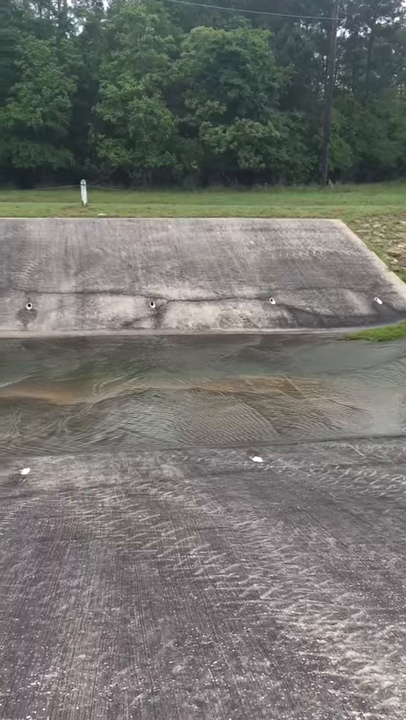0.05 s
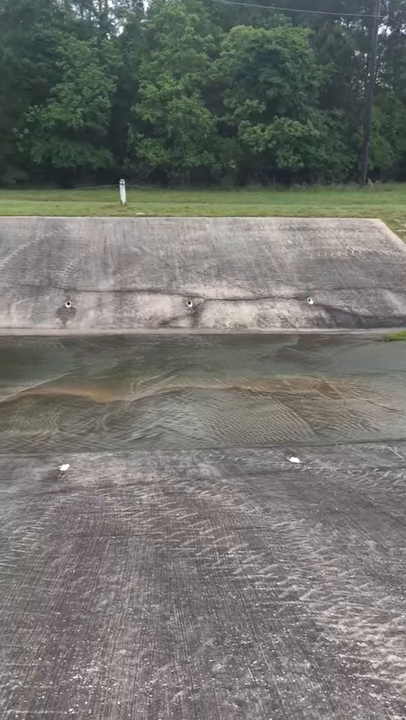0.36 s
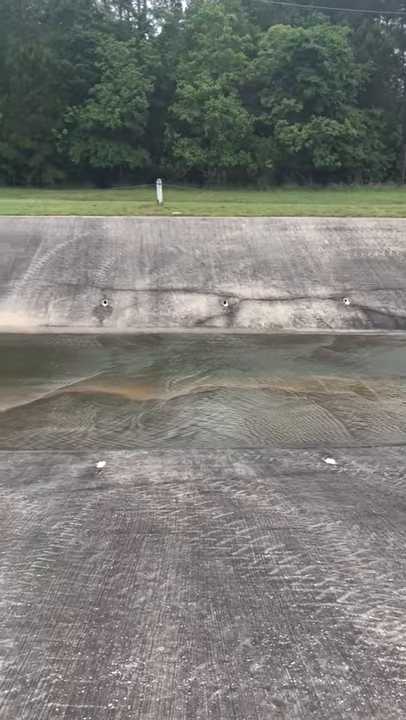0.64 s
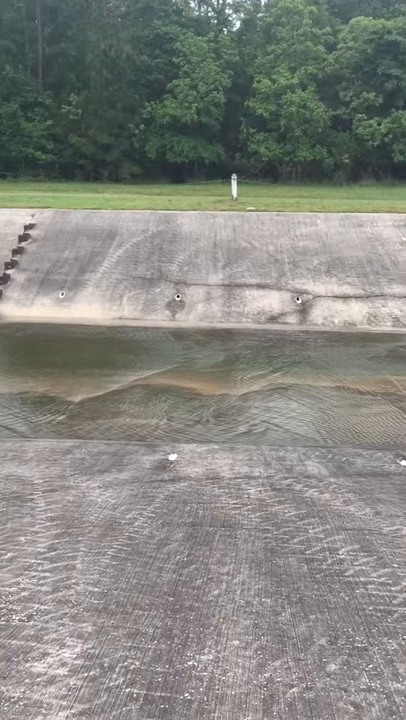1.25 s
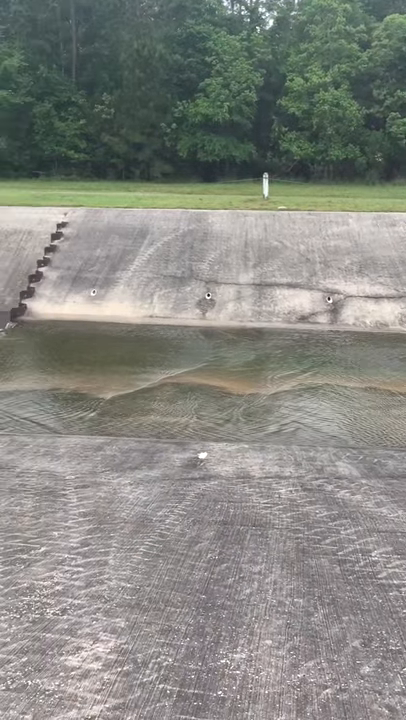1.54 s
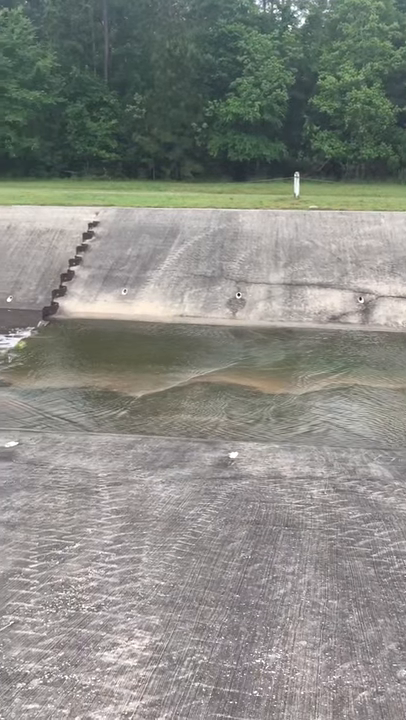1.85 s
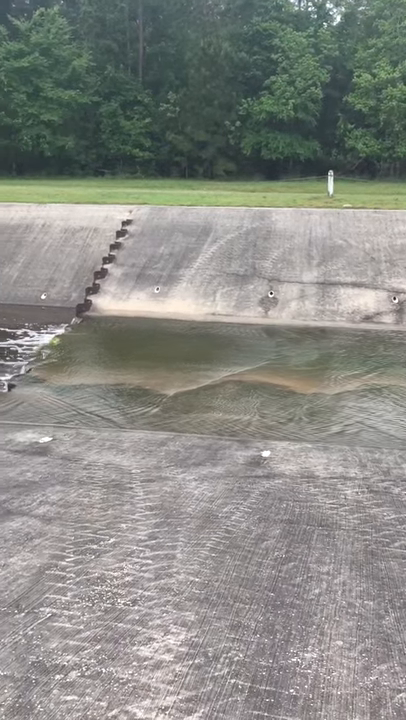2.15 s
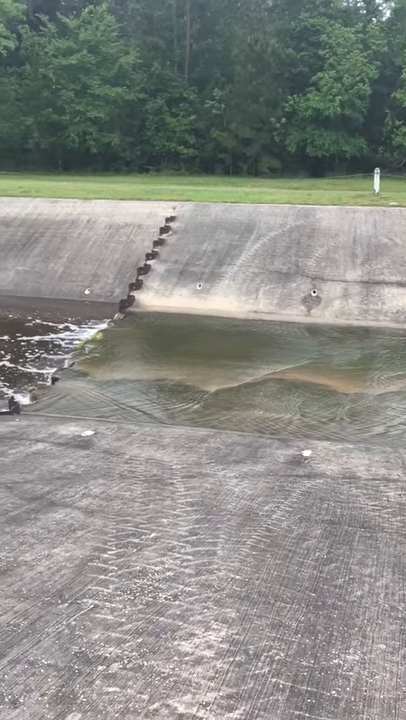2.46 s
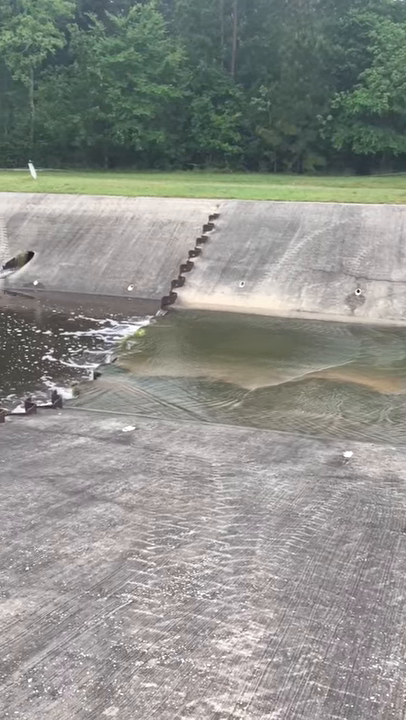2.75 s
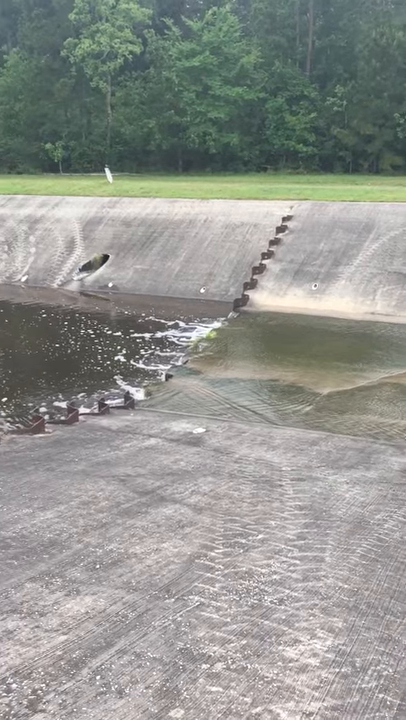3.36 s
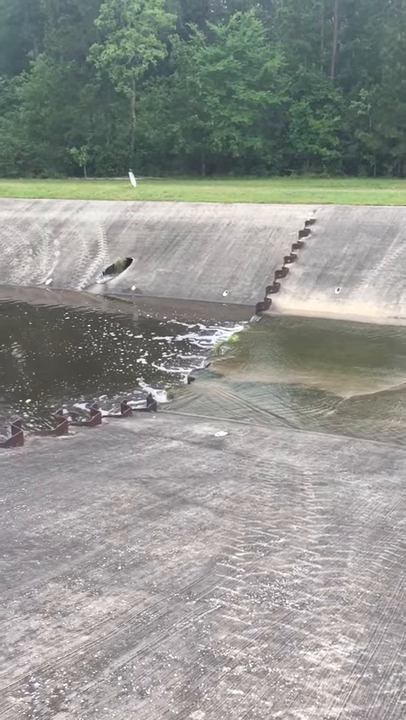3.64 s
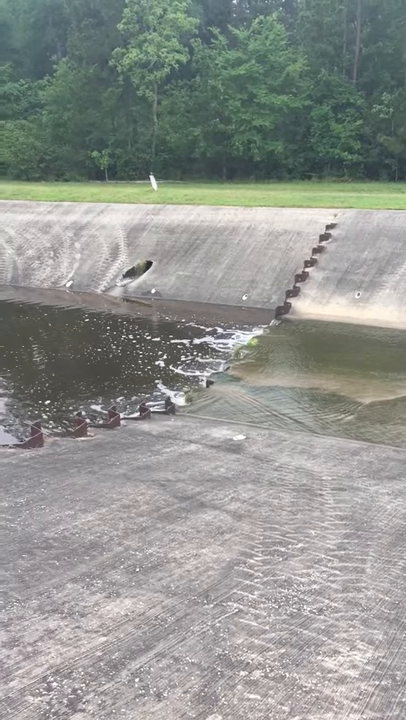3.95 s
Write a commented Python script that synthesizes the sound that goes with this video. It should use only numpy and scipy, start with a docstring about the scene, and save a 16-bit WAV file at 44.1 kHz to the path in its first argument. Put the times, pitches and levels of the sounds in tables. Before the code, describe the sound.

Shallow water rushes and bubbles steadily down an outdoor concrete spillway, churning a little more as the microphone turns toward a row of blocks. Birds chirp and rattle early on, over faint insects and a low rumble.

```python
"""Shallow water runs down a concrete spillway and bubbles over a row of blocks: turbulence gives
broadband noise, and each trapped bubble rings as a damped oscillator. Beneath it lies a low outdoor
rumble, and insects buzz steadily in the trees. A distant bird gives two harsh rattles, a near one calls
twice (a rising chip, then a falling note) and a far one adds thin down-slurred chirps.
Scattering from trunks and leaves gives every call a reverberant tail."""
import sys
import numpy as np
from scipy import signal
from scipy.fft import rfft, irfft
from scipy.io import wavfile

SR = 44100
rng = np.random.default_rng(int(sys.argv[2]) if len(sys.argv) > 2 else 0)


def persist_wave(psi):
    """Save psi, clipped to +-1, as 16-bit WAV."""
    counts = np.round(np.clip(psi, -1, 1) * 32767).astype(np.int16)
    wavfile.write(sys.argv[1], SR, np.atleast_2d(counts).T)


N = 176400
FREQS = np.fft.rfftfreq(N, 1 / SR)


def undb(db):
    """Amplitude ratio: a factor of ten for every 20 dB."""
    return 10 ** (np.asarray(db) / 20)


def level(x, db):
    """Normalisation to an rms level."""
    return x * undb(db) / np.sqrt(np.mean(x ** 2))


def add(out, start_s, x):
    """Superposition of a sound at a given time; it may already be under way."""
    i = min(int(start_s * SR), N)
    x, i = x[max(-i, 0):], max(i, 0)
    out[i:i + len(x)] += x[:N - i]


def swell(points):
    """A gain envelope interpolated through (seconds, dB) points."""
    return undb(np.interp(np.arange(N) / SR, *np.array(points).T))


def wander(rate_hz):
    """Low-pass noise: a smooth random drift with a spread of 1."""
    lowpass = np.exp(-(FREQS / rate_hz) ** 2) * (FREQS > 0)
    return level(irfft(rfft(rng.standard_normal(N)) * lowpass, N), 0)


def noise(points, db):
    """Spectral shaping of white noise by (Hz, dB) points, with steep skirts."""
    hz, gain_db = np.array(points, float).T
    f = FREQS + 1
    skirts = np.minimum(1, np.minimum(f / hz[0], hz[-1] / f)) ** 4
    shape = undb(np.interp(np.log(f), np.log(hz), gain_db))
    return level(irfft(rfft(rng.standard_normal(N)) * skirts * shape, N), db)


def resonance(hz, width_hz):
    """A band-pass resonance driven by white noise, at an rms of 1."""
    detuning = 2 * (FREQS - hz) / width_hz
    return level(irfft(rfft(rng.standard_normal(N)) / np.hypot(1, detuning ** 2), N), 0)


def modes(rows):
    """Superposition of independent noise-driven resonances."""
    return sum(undb(db) * resonance(hz, width_hz) for hz, width_hz, db in rows)


def flicker(x, count=9, flicker_db=1.7, surge_db=.7):
    """Random amplitude modulation: half-octave bands flicker separately and surge together."""
    place = np.clip(2 * np.log2((FREQS + 1) / 250), 0, count - 1)
    spectrum = rfft(x)
    bands = (irfft(spectrum * np.maximum(1 - abs(place - k), 0), N) for k in range(count))
    flickering = sum(band * undb(flicker_db * wander(22)) for band in bands)
    return flickering * undb(surge_db * wander(21))


# Spectra of the rush and of the churning. Each row: frequency in Hz, relative density in dB.
RUSH_SPECTRUM = [(300, -26), (500, -24.5), (700, -1.5), (900, 0.5), (1200, -2), (1600, 5), (2000, -0.5),
                 (2500, -3.5), (3100, -5), (4200, -12.5), (4700, -27)]
CHURN_SPECTRUM = [(130, -2), (220, 0), (300, 1), (360, -1.5), (425, -6.5), (480, -12), (600, -6),
                  (760, -13), (1100, -10.5), (1800, -17), (4000, -53)]
# How much the microphone faces the blocks. Each row: time in seconds, gain of the churning in dB.
FACING_BLOCKS = [(0, -11), (.9, -16), (1.5, -0.5), (2.2, -6.5), (2.8, 0), (3.3, -1), (4, 3.5)]


def flow():
    """Turbulence makes broadband noise: a steady rush, and lower churning at the blocks."""
    rush = noise(RUSH_SPECTRUM, db=-53.5)
    churn = swell(FACING_BLOCKS) * noise(CHURN_SPECTRUM, db=-51)
    return flicker(rush + churn)


def bubble(hz, cycles, rise=.0535):
    """A damped oscillator that rises in pitch and decays by 1/e in `cycles` periods."""
    age = np.arange(int(4 * cycles / hz * SR)) * hz / cycles / SR  # in decay times
    phase = 2 * np.pi * cycles * (age + rise * age ** 2 / 4)
    return np.sin(phase) * np.exp(-age) * (1 - np.exp(-4 * age))


def bubble_cloud(low_hz, high_hz, cycles, db, spread_db, count=1600):
    """Bubbles with power-law amplitudes: most are faint, a few stand out."""
    out = np.zeros(N)
    for when, pitch, rank in rng.random((count, 3)):
        hz = low_hz * (high_hz / low_hz) ** pitch
        gain = undb(-spread_db * np.log(rank + .005))
        add(out, when * N / SR, gain * bubble(hz, cycles))
    return level(out, db)


# Hollow resonances in the flow. Each row: frequency in Hz, bandwidth in Hz, level in dB.
HOLLOW_MODES = [(767, 56, -63.5), (1520, 140, -71), (1717, 36, -66)]


def blocks():
    """Directional pickup: hollow tones and clear plinks grow as the microphone turns to the blocks."""
    hollow = modes(HOLLOW_MODES)
    plinks = bubble_cloud(700, 3400, cycles=17, db=-61.5, spread_db=2.2, count=170)
    return np.sqrt(swell(FACING_BLOCKS)) * (hollow + plinks)


# Resonances behind the blocks. Each row: frequency in Hz, bandwidth in Hz, level in dB.
POCKET_MODES = [(297, 44, -58), (421, 17, -66.5)]
# Their swell. Each row: time in seconds, gain in dB.
POCKET_SWELL = [(0, -7), (.9, -10), (1.5, -2.5), (2.0, -2.5), (2.35, 3.5), (3.0, -1.5), (3.6, 2.5), (4, 6)]


def drone():
    """Resonance of water pocketed behind the blocks: a low drone that builds unevenly."""
    return modes(POCKET_MODES) * swell(POCKET_SWELL)


# Spectrum of fine spray. Each row: frequency in Hz, relative density in dB.
SPRAY_SPECTRUM = [(3500, -4), (4600, 3), (6400, -1.5), (8000, -4), (9500, -7.5), (10400, -13), (11200, -9),
                  (13500, -10), (15500, -11.5)]


def spray():
    """The smallest bubbles resonate highest, adding fizz to the hiss of the spray."""
    hiss = noise(SPRAY_SPECTRUM, db=-66.5)
    return hiss + bubble_cloud(6050, 14600, cycles=14, db=-78.5, spread_db=2.2)


# Bubble families. Each row: lowest and highest pitch in Hz, decay in cycles, level in dB, spread in dB.
BUBBLE_FAMILIES = [(452.7, 1100, 11.4, -62, 5), (1095, 3200, 18.8, -59, 4), (2814, 4800, 23.5, -67.5, 4.5)]


def babble():
    """A bubble's size sets its resonance, so three size families fill three pitch ranges."""
    return sum(bubble_cloud(*family) for family in BUBBLE_FAMILIES)


# Spectrum of the rumble. Each row: frequency in Hz, relative density in dB.
RUMBLE_SPECTRUM = [(18, -32), (25, -31), (35, -17), (50, -3.5), (75, 0), (100, -3.5), (113, -2), (128, -8),
                   (170, -12), (215, -17.5), (300, -23.5), (450, -39.5), (800, -71)]
# Its swell. Each row: time in seconds, gain in dB.
RUMBLE_GAIN = [(0, 1), (.7, -1.5), (1.3, -0.5), (1.7, 1.5), (2.2, -1), (2.8, .5), (4, 1)]


def rumble():
    """Low outdoor noise under slow, shallow amplitude modulation."""
    return noise(RUMBLE_SPECTRUM, db=-38) * swell(RUMBLE_GAIN)


def insects(throb_db=1.38):
    """Incoherent summation blurs a distant chorus into one narrow, throbbing band."""
    return level(resonance(5264, width_hz=390) * undb(throb_db * wander(60)), db=-58.5)


def wavering_phase(hz, depth=.009):
    """Phase is the integral of frequency, here with a slight random waver."""
    return 2 * np.pi * np.cumsum(hz * (1 + depth * wander(250)[:len(hz)])) / SR


def whistle(contour, harmonics, db):
    """A nonlinear oscillator: a bird's overtones emerge where the note is loudest."""
    times, hz, contour_db = np.array(contour, float).T
    t = np.arange(int(times[-1] * SR)) / SR
    phase = wavering_phase(np.interp(t, times, hz))
    envelope = undb(np.interp(t, times, contour_db))
    brightness = (envelope / envelope.max()) ** 2
    voice = sum(undb(k_db) * np.sin(k * phase) * (1 if k == 1 else brightness) for k, k_db in harmonics)
    return undb(db) * envelope * signal.windows.tukey(len(t), .1) * np.sqrt(2) * voice


def scatter(x, envelope, wet_db):
    """Convolution with decaying noise adds diffuse reflections to the direct sound."""
    tail = rng.standard_normal(len(envelope)) * envelope
    return x + undb(wet_db) * signal.fftconvolve(x, tail / np.linalg.norm(tail))[:N]


def forest(x, wet_db, t60_s=.68, delay_s=.014):
    """Reverberation: trunks and leaves return a delayed, exponentially fading tail."""
    t = np.arange(SR) / SR
    return scatter(x, np.exp(-np.log(1000) * t / t60_s) * (t > delay_s), wet_db)


# Harsh rattles. Each row: start in seconds, length in seconds, pulse rate in Hz, level in dB.
RATTLE_CALLS = [(.022, .25, 25, -44.5), (1.345, .23, 22.5, -44.3)]
# Throat resonances. Each row: frequency in Hz, bandwidth in Hz, relative level in dB.
THROAT_FORMANTS = [(1120, 450, -2.5), (1540, 320, 0), (4300, 900, -15), (7600, 1100, -19)]
# The clear note that opens a rattle. Each row: time into the note in seconds, pitch in Hz, gain in dB.
OPENING_CONTOUR = [(0, 1130, -12), (.018, 1110, 0), (.036, 1115, 0), (.052, 1125, -12)]
# Its partials. Each row: harmonic number, gain in dB.
OPENING_HARMONICS = [(1, -3), (2, -13), (3, -14.5), (4, -17), (7, -22)]


def rattling_bird(lead_s=.056, dip_db=10.5, fade_db_per_s=29.5):
    """Source and filter: after a clear note, fading noise pulses sound through the throat's formants."""
    out = np.zeros(N)
    rasp = level(modes(THROAT_FORMANTS), 0)
    for start, length, rate, db in RATTLE_CALLS:
        t = np.arange(int(length * SR)) / SR
        pulses = undb(db - fade_db_per_s * t - dip_db * np.cos(np.pi * rate * t) ** 4)
        breath = np.roll(rasp, -int(start * SR))[:len(t)]
        add(out, start - lead_s, whistle(OPENING_CONTOUR, OPENING_HARMONICS, db=-45))
        add(out, start, breath * pulses * signal.windows.tukey(len(t), .1))
    return forest(out, wet_db=-5)


def leaves(x, decay_s=.014):
    """Early scattering from nearby foliage briefly smears a note."""
    t = np.arange(SR // 10) / SR
    return scatter(x, np.exp(-t / decay_s), wet_db=-5.5)


# Two-note calls. Each row: start in seconds, chip level in dB, falling-note level in dB.
NEAR_CALLS = [(.146, -41, -43), (.532, -41, -44)]
# The two notes. Each row: time into the note in seconds, pitch in Hz, gain in dB.
CHIP_CONTOUR = [(0, 3100, -12), (.008, 3500, -5), (.015, 4130, -4), (.022, 4115, 0), (.031, 4065, -1.5),
                (.04, 4000, -8), (.05, 3880, -15)]
FALL_CONTOUR = [(0, 2480, -22), (.006, 2340, -1), (.013, 2250, -7), (.021, 2100, -1), (.03, 2020, 2),
                (.044, 1920, -12), (.06, 1820, -9), (.07, 1760, -2), (.085, 1640, -13)]
# Their partials. Each row: harmonic number, gain in dB.
CHIP_HARMONICS = [(1, -0.5), (2, -38), (3, -28)]
FALL_HARMONICS = [(1, -0.5), (4, -23.5)]


def near_bird(fall_after_s=.087):
    """Frequency modulation shapes each call: a rising chip, then a lower falling note."""
    chips, falls = np.zeros(N), np.zeros(N)
    for start, chip_db, fall_db in NEAR_CALLS:
        add(chips, start, whistle(CHIP_CONTOUR, CHIP_HARMONICS, chip_db))
        add(falls, start + fall_after_s, whistle(FALL_CONTOUR, FALL_HARMONICS, fall_db))
    return forest(leaves(chips), wet_db=-7.5) + forest(leaves(falls), wet_db=-9.5)


# Larger gurgles. Each row: start in seconds, nominal pitch in Hz, level per bubble in dB.
AIR_POCKETS = [(.322, 755, -41), (.72, 988, -44.5), (.816, 824, -60), (.963, 1040, -43.5),
               (1.386, 3400, -42), (1.675, 555, -43.5), (1.862, 670, -43.5), (2.252, 920, -45),
               (2.63, 770, -41), (2.65, 1180, -41.5), (2.727, 970, -42), (2.822, 3700, -45),
               (3.171, 1650, -41.5), (3.267, 1460, -42.5), (3.404, 880, -44), (3.52, 674, -43.5),
               (3.569, 2700, -51), (3.662, 810, -42)]


def gurgles(count=5, breakup_s=.017):
    """Fragmentation: trapped air breaks into a few bubbles of like size and so of like pitch."""
    out = np.zeros(N)
    for start, hz, db in AIR_POCKETS:
        for k, octaves in enumerate(.48 * rng.uniform(-.57, 1, count)):
            add(out, start + breakup_s * k / count, undb(db) * bubble(hz * 2 ** octaves, cycles=4.2))
    return out


# Spray ticks. Each row: start in seconds, centre frequency in Hz, level in dB.
DROPLETS = [(.362, 12500, -68), (.93, 11800, -66), (1.508, 9500, -68), (1.928, 12500, -70),
            (2.94, 9300, -66), (3.888, 13300, -65)]


def droplets(decay_s=.008):
    """Impact transients: single droplets tick high above the hiss and decay exponentially."""
    out, t = np.zeros(N), np.arange(SR // 20) / SR
    for start, hz, db in DROPLETS:
        add(out, start, undb(db) * resonance(hz, width_hz=.2 * hz)[:len(t)] * np.exp(-t / decay_s))
    return out


# Thin chirps. Each row: start in seconds, length in seconds, first and last pitch in Hz, level in dB.
FAR_SLURS = [(1.792, 0.0059, 4580, 3660, -48.5), (2.023, 0.016, 4470, 3630, -61),
             (3.725, 0.12, 4510, 3360, -56), (3.962, 0.088, 7500, 7000, -68)]


def far_bird(bend=1.45, shimmer_db=2):
    """Frequency sweeps: shimmering pure tones drop fast and level off."""
    out = np.zeros(N)
    for start, length, first_hz, last_hz, db in FAR_SLURS:
        remaining = np.linspace(1, 0, int(length * SR))
        hz = last_hz + (first_hz - last_hz) * remaining ** bend
        slur = np.sin(wavering_phase(hz)) * signal.windows.tukey(len(hz), .3)
        add(out, start, level(slur, db))
    return forest(out * undb(shimmer_db * wander(48)), wet_db=-6)


def scene():
    """Superposition: water, rumble, insects and birds add at one microphone."""
    water = flow() + blocks() + drone() + spray() + babble() + gurgles() + droplets()
    return (water + rumble() + insects() + near_bird() + far_bird() + rattling_bird())[None]


def record(dry, cutoff_hz=15700, edge_hz=200):
    """Band limiting: a steep low-pass filter removes the highest treble."""
    return irfft(rfft(dry) * np.clip((cutoff_hz - FREQS) / edge_hz + .5, 0, 1), N)


dry = scene()
out = record(dry)
persist_wave(out)
```